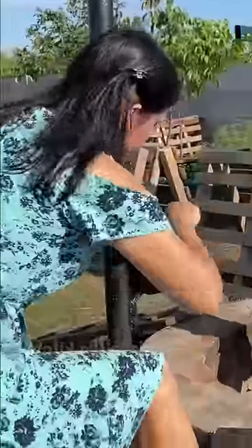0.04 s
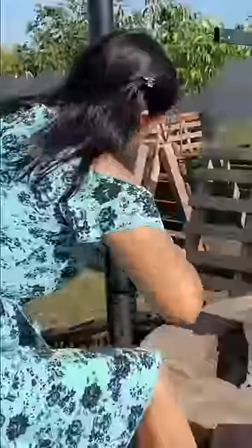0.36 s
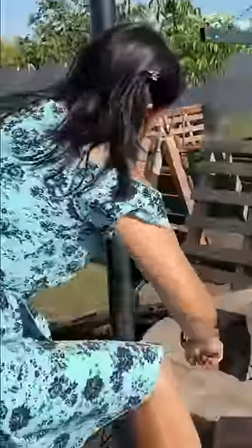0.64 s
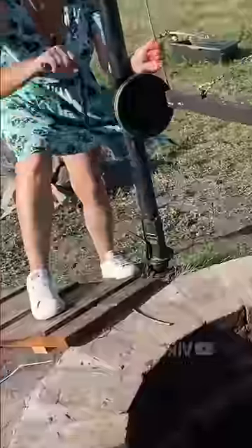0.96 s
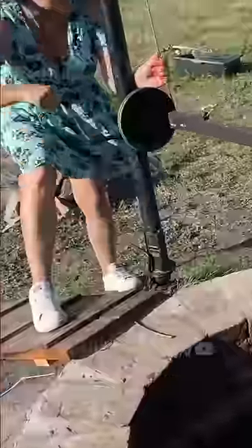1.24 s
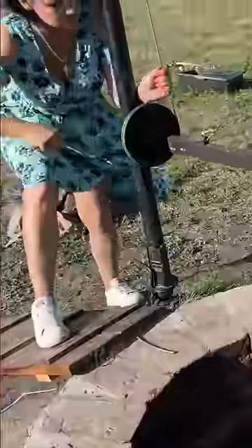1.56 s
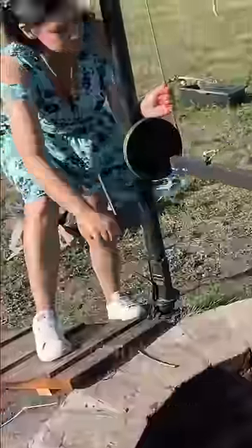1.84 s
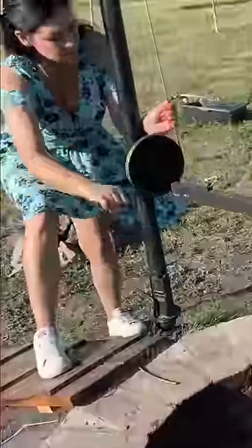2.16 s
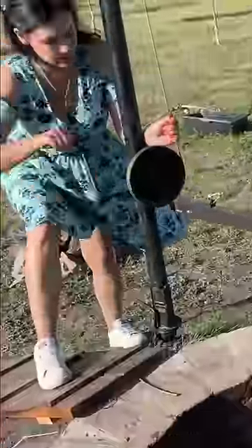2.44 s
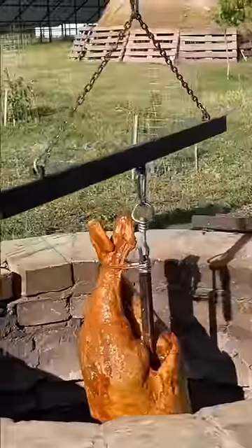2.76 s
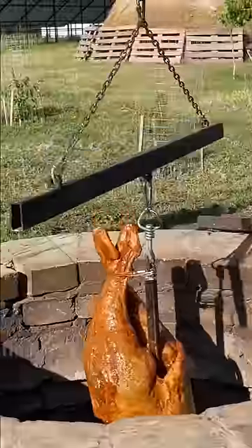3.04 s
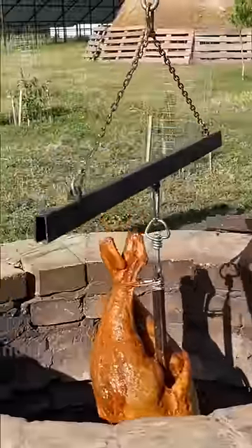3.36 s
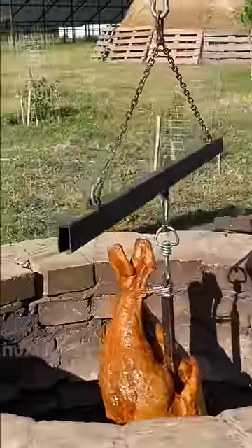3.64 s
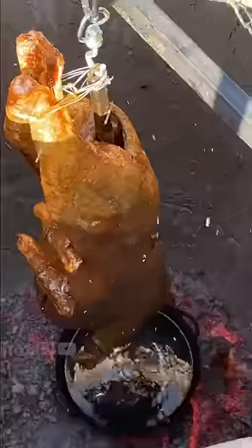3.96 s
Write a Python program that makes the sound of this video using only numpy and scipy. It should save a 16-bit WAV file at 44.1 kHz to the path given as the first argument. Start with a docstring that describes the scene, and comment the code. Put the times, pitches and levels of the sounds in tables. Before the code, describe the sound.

A hand winch ratchet clicks rapidly for the whole four seconds, in uneven runs at about two and a half turns a second. Each steel tooth rasps, snaps and rings briefly, with clanks and light ticks between runs. One tooth catches with a hard crunch at about 0.9 seconds, and the post thuds softly, most at 1.1 seconds. Faint outdoor hush and low wind lie underneath.

```python
"""Hand winch outdoors.

A winch is cranked about two and a half turns a second, hoisting a load from a pit. At each tooth the pawl rasps
up the steel flank and snaps down, ringing wheel and frame; once a heavy clack crunches the frame. Between runs
of teeth the gear ticks lightly. The post knocks and thuds over faint air and wind."""
import sys
import numpy as np
from scipy import signal
from scipy.fft import rfft, irfft
from scipy.io import wavfile
from scipy.ndimage import uniform_filter1d

SR = 44100
rng = np.random.default_rng(int(sys.argv[2]) if len(sys.argv) > 2 else 0)


def wav_record(signal):
    """Record a signal, one row per channel, as 16-bit PCM in the file named by sys.argv[1]."""
    frames = np.transpose(np.atleast_2d(signal))
    bounded = np.clip(frames, -1, 1)
    # unit amplitude maps onto the largest positive 16-bit level
    quanta = np.round(bounded * 32767).astype(np.int16)
    wavfile.write(sys.argv[1], SR, quanta)


N = 176400
TAPS = 4096
HZ = np.fft.rfftfreq(TAPS, 1 / SR)

# Pawl passing a tooth. Each row: snap time in seconds, snap in dB, rasp in dB,
# frame clank lift in dB, high ping lift in dB, kind of contact.
TEETH = [(0.0397, -23.5, -30, -4.5, 9.5, "glint"), (0.0878, -11.5, -23, -7, 0, "crack"),
         (.1603, -18, -23, -6, -4, "plain"), (0.2161, -14, -21, -9, -5.5, "plain"),
         (0.3321, -16.5, -27, 3, 0, "clank"), (0.389, -21, -29, -4.5, 4.5, "glint"),
         (0.4365, -14, -21, -10.5, -2.5, "crack"), (0.5, -15.5, -24, -4, -0.5, "plain"),
         (0.552, -18.5, -20, -10, -8, "plain"), (.6946, -18, -24.5, 2.5, .5, "clank"),
         (0.751, -22, -31, -5.5, 6.5, "glint"), (0.8042, -18.5, -21.5, -5.5, -2, "crack"),
         (0.8744, -12, -20.5, 4, -7, "plain"), (0.9683, -19.5, -28.5, -7.5, 0, "glint"),
         (1.0127, -15.5, -23.5, -2, 2.5, "crack"), (1.0634, -15, -30.5, 7.5, 5.5, "plain"),
         (1.1045, -10, -27, -5.5, -5, "plain"), (1.22, -20.5, -28.5, 8.5, 7, "clank"),
         (1.2778, -24.5, -28.5, -7, 3.5, "glint"), (1.3258, -18.5, -23.5, 1, 1, "crack"),
         (1.3848, -18, -34, 3.5, 17, "ping"), (1.4419, -17.5, -23, -5, 0, "plain"),
         (1.5712, -17.5, -29.5, 13.5, 6, "clank"), (1.6184, -22, -31, -5.5, 3, "glint"),
         (1.6618, -14, -24, -6.5, 2, "plain"), (1.726, -20, -28, -4, 8.5, "ting"),
         (1.781, -17, -23, -9, -1, "plain"), (1.9381, -23, -26.5, 9, 0.5, "clank"),
         (2.0004, -24.5, -30, -8, 2, "glint"), (2.07, -16.5, -23, -4, 0, "plain"),
         (2.1419, -23.5, -26.5, -3.5, -2, "plain"), (2.2033, -19.5, -24, -4.5, 1.5, "plain"),
         (2.344, -38, -26.5, 10, 2, "clank"), (2.415, -21.5, -31.5, -6.5, 3.5, "glint"),
         (2.4679, -42, -21.5, -6.5, -1, "plain"), (2.5393, -22, -31.5, 0.5, 17, "ping"),
         (2.6006, -20, -24.5, -4.5, 2, "plain"), (2.7623, -19, -29.5, 9, 5, "clank"),
         (2.8208, -19, -31.5, -6, -1, "glint"), (2.8795, -16, -23, -5.5, 2.5, "plain"),
         (2.9458, -24, -28.5, 2.5, 10, "ting"), (3.0006, -12, -22.5, -10, -2.5, "plain"),
         (3.159, -19.5, -29, 14.5, 5.5, "clank"), (3.2283, -26, -29, -5, 2, "glint"),
         (3.2792, -13.5, -22, -5.5, -0.5, "plain"), (3.3457, -25, -29, 2.5, 12.5, "ting"),
         (3.4, -14, -22.5, -8.5, -6.5, "plain"), (3.574, -19, -28, 12, 4.5, "clank"),
         (3.6535, -24.5, -30.5, -11, 3.5, "glint"), (3.7092, -14.5, -21, -8.5, -5, "crack"),
         (3.7796, -18.5, -28, 0, 5.5, "ting"), (3.8472, -20.5, -22, -7, -2, "plain")]


def amp(db):
    """Decibels to gain."""
    return 10 ** (np.asarray(db) / 20)


def unit(x):
    """Scale to rms 1."""
    return x / np.sqrt(np.mean(x ** 2) + 1e-20)


def add(mix, start_s, sound):
    """Mix a sound in, cropped at both ends."""
    at = round(start_s * SR)
    part = mix[max(at, 0):max(at + len(sound), 0)]
    part += sound[max(-at, 0):][:len(part)]


def curve_at(points, hz):
    """Interpolate (Hz, value) points over log frequency."""
    point_hz, value = np.transpose(points)
    return np.interp(np.log(hz + 1), np.log(point_hz + 1), value)


def peaks(modes):
    """Summed resonance curves over HZ."""
    return sum(lift / (1 + (2 * (HZ - hz) / width_hz) ** 2) for hz, width_hz, lift in modes)


def shaped_noise(size, db_at):
    """Unit-rms noise with spectral shape db_at(hz)."""
    gain = amp(db_at(np.fft.rfftfreq(size, 1 / SR)))
    return unit(irfft(rfft(rng.standard_normal(size)) * gain, size))


def band_noise(hz, width_hz, size):
    """Noise in one steep resonance."""
    return shaped_noise(size, lambda f: -20 * np.log10(1 + (2 * (f - hz) / width_hz) ** 2))


def open_air():
    """Steady hush and low wind rumble; the level dips briefly once."""
    # Hush spectrum. Each row: frequency in Hz, relative level in dB.
    air_shape = [(20, -10), (40, -16.5), (80, 0), (180, 6.5), (450, -3), (700, -6), (1500, -9.5),
                 (2500, -10), (3700, -5.5), (5000, -13), (8000, -18), (12000, -24), (16000, -31)]
    # Wind strength. Each row: time in seconds, relative level in dB.
    wind_curve = [(0, -73), (.35, -59), (.85, -65), (1.0, -56), (1.4, -49), (1.6, -56), (2.15, -52),
                  (2.6, -63), (3.2, -60), (4, -59)]
    t = np.arange(N) / SR
    hush = amp(-54) * shaped_noise(N, lambda f: curve_at(air_shape, f))
    rumble = shaped_noise(N, lambda f: -10 * np.log10((1 + (f / 92) ** 4) * (1 + (25 / (f + 1)) ** 4)))
    wind_db = np.interp(t, *np.transpose(wind_curve)) - 7
    dip_db = -10 * np.exp(-((t - 0.925) / 0.015) ** 2)
    return amp(dip_db) * (hush + rumble * amp(wind_db))


def rasp(t, rasp_db, snap_db):
    """The pawl scrapes up the flank, sagging just before the snap at t = 0, then rattles out."""
    full_s, rise_s, sag_db, decay_db_per_s = 0.011, 0.0078, -4.5, 1356
    early = np.maximum(-t - full_s, 0) / rise_s
    swell_db = -19 * (np.sqrt(1 + early ** 2) - 1)
    sag = np.clip(1 + t / full_s, 0, 1)
    climb = amp(rasp_db + 1.34 + swell_db + sag_db * sag)
    rattle = np.hypot(amp(rasp_db - 2), amp(snap_db - 17)) * amp(-decay_db_per_s * abs(t))
    noise = rng.standard_normal(len(t))
    grain_db = 1.2 * unit(uniform_filter1d(rng.standard_normal(len(t)), size=24))
    return np.where(t < 0, climb, rattle) * unit(noise * amp(grain_db))


def snap(t, strike_share):
    """The pawl lands: milliseconds of chatter with one hard strike at the crest."""
    lead_s, rise_s, decay_s = 0.0004, 0.0012, 0.0013
    t = t + lead_s
    envelope = np.exp(-abs(t) / np.where(t < 0, rise_s, decay_s))
    chatter = envelope * rng.choice([-1., 1.], len(t))
    chatter /= np.linalg.norm(chatter)
    strike = np.arange(len(t)) == np.argmin(abs(t))
    force = np.sqrt(strike_share) * strike + np.sqrt(1 - strike_share) * chatter
    return amp(2.5) * np.sqrt(decay_s * SR) * force


def steel_response_db():
    """Frequency response of wheel, pawl and frame, at unit power."""
    # Broad colour. Each row: frequency in Hz, relative level in dB.
    colour = [(150, -24), (450, -23.5), (680, -26), (1000, -16.5), (1600, -14.5), (2600, -12),
              (5000, -14.5), (6000, -7), (7600, -5.5), (8300, -12), (9800, -5), (10650, -6), (11500, -20),
              (13000, -22.5), (15700, -27)]
    # Resonances. Each row: frequency in Hz, width in Hz, lift over the colour in dB.
    modes = [(1027, 80, 7.5), (1152, 57, -6), (1670, 104, -4.5), (1948, 190, 13), (2950, 210, 7),
             (3496, 121, 14), (3652, 65, 9.5), (3980, 390, 7), (4340, 90, -4.5), (4530, 510, 5.5),
             (5374, 68, 11.5), (5640, 42, 8.5), (6205, 115, 3.5), (6450, 80, 8.5), (7170, 80, 2),
             (7930, 170, 5.5), (8510, 61, 9.5), (8940, 87, 7), (9120, 93, -5.5), (11610, 180, 10),
             (12470, 260, 9.5)]
    db = curve_at(colour, HZ) + peaks(modes)
    return db - 10 * np.log10(np.mean(amp(db) ** 2))


def ring_steel(force, response_db):
    """A force rings the loaded, quickly damped steel, slightly differently at each contact."""
    ripple_db, ripple_width_hz, damping_s = 1.57, 320, 0.009
    smoother = np.exp(-(2 * (HZ[:200] - HZ[100]) / ripple_width_hz) ** 2)
    ripple = unit(signal.oaconvolve(rng.standard_normal(len(HZ)), smoother, "same"))
    varied_db = response_db + ripple_db * ripple
    varied_db += 10 * np.log10(np.sum(amp(response_db) ** 2) / np.sum(amp(varied_db) ** 2))
    log_gain = np.log(amp(np.r_[varied_db, varied_db[-2:0:-1]]))
    impulse = np.fft.ifft(np.exp(np.conj(signal.hilbert(log_gain)))).real  # minimum phase
    damped = impulse * np.exp(-(np.arange(TAPS) / SR / damping_s) ** 2)
    return signal.fftconvolve(force, damped[:TAPS // 2])


def ratchet():
    """Rasp and snap ring the steel at every tooth, with light ticks and rubs between."""
    # Pawl on tooth, by kind. Each row: strike's share of snap energy, ping in Hz, glint lift in dB.
    contacts = {"plain": (.1, 7150, 0), "crack": (.5, 7150, 0), "clank": (.17, 7850, -2),
                "glint": (.1, 7300, 17), "ping": (.42, 6950, 17), "ting": (.45, 7550, 18)}
    # Frame clank. Each row: frequency in Hz, share of the lift.
    clank_shape = [(300, 0), (750, 0.1), (1100, 0.75), (1550, 0.4), (2100, 0.83), (2650, 0.25),
                   (3600, 0.32), (5800, -0.27), (7500, 0)]
    # Glinting contact. Each row: frequency in Hz, width in Hz, share of the lift.
    glint_modes = [(1390, 530, 0.367), (14680, 470, 1)]
    # Ticks at the slow point of the turn. Each row: time in seconds, level in dB.
    ticks = [(0.278, -29), (0.6311, -27.5), (1.1703, -29.5), (1.8687, -27.5), (2.2797, -31),
             (2.6973, -32.5), (3.0884, -33), (3.4871, -31.5), (3.9418, -29.5)]
    # Gear rubs. Each row: start in seconds, length in seconds, level in dB.
    rubs = [(1.485, 0.049, -41), (1.807, 0.026, -48.5)]
    ping_width_octaves, brush_s = 0.105, 0.0076
    out = np.zeros(N)
    t = np.arange(-TAPS // 2, TAPS // 2) / SR
    steel_db, clank, glint = steel_response_db(), curve_at(clank_shape, HZ), peaks(glint_modes)
    for at_s, snap_db, rasp_db, clank_db, ping_db, kind in TEETH:
        strike_share, ping_hz, glint_db = contacts[kind]
        force = rasp(t, rasp_db, snap_db) + amp(snap_db) * snap(t, strike_share)
        ping = np.exp(-0.5 * (np.log2((HZ + 1) / ping_hz) / ping_width_octaves) ** 2)
        response_db = steel_db + clank_db * clank + ping_db * ping + glint_db * glint
        add(out, at_s + t[0], ring_steel(force, response_db))
    for at_s, db in ticks:  # each barely brushes the tooth and nudges the frame
        brush = amp(db - 12.5) * np.exp(-abs(t) / brush_s) * rng.standard_normal(TAPS)
        force = amp(db) * snap(t, strike_share=0.1) + brush
        add(out, at_s + t[0], ring_steel(force, steel_db + 3 * clank))
    for start_s, length_s, db in rubs:
        swell = np.sin(np.pi * np.arange(0, length_s, 1 / SR) / length_s)
        friction = amp(db) * swell * rng.standard_normal(SR)[:len(swell)]
        add(out, start_s, ring_steel(friction, steel_db))
    return out


def wheel_ring(drive):
    """The wheel sings on briefly after each tooth."""
    # Long-ringing modes. Each row: frequency in Hz, gain in dB, T60 in seconds.
    modes = [(3650, -9, .16), (3730, -7, .22), (9920, -9, .08), (10260, -8, .07), (10560, -11, .06)]
    t = np.arange(SR // 2) / SR
    impulse = np.zeros(len(t))
    for hz, db, t60_s in modes:
        decay = amp(-60 * t / t60_s)
        impulse += amp(db) * 2 * decay / decay.sum() * np.sin(2 * np.pi * hz * t)
    return signal.fftconvolve(drive, impulse)[:N]


def post():
    """The post knocks under each snap and thuds as the load shifts."""
    # Knock resonances. Each row: frequency in Hz, width in Hz, relative level in dB.
    knock_bands = [(273, 210, -47), (405, 46, -49.5), (482, 22, -48.5)]
    # Thuds. Each row: start in seconds, level in dB.
    thuds = [(0.208, -49.5), (0.869, -47), (1.1, -39), (1.48, -47), (2.345, -53), (2.696, -46.5),
             (3.09, -52), (3.938, -50)]
    knock_lead_s, knock_rise_s, knock_db_per_snap_db = 0.0019, 0.0045, 0.28
    thud_hz, thud_width_hz, thud_rise_s = 190, 74, 0.01
    out = np.zeros(N)
    t = np.arange(2 * TAPS) / SR
    knock_envelope = t / knock_rise_s * np.exp(1 - t / knock_rise_s)
    thud_envelope = t / thud_rise_s * np.exp(1 - t / thud_rise_s)
    for at_s, snap_db, *_ in TEETH:
        knock = sum(amp(db) * band_noise(hz, width_hz, len(t)) for hz, width_hz, db in knock_bands)
        add(out, at_s - knock_lead_s, amp(knock_db_per_snap_db * snap_db) * knock * knock_envelope)
    for start_s, db in thuds:
        tone = np.sin(2 * np.pi * thud_hz * t) + 0.5 * band_noise(thud_hz, thud_width_hz, len(t))
        add(out, start_s, amp(db) * tone * thud_envelope)
    return out


def heavy_clack():
    """A single heavy clack crunches the whole frame."""
    # Crunch bands. Each row: frequency in Hz, width in Hz, level in dB.
    bands = [(235, 540, -42.5), (1920, 220, -30), (2090, 240, -28.5)]
    at_s, spread_s = 0.873, 0.014
    out = np.zeros(N)
    t = np.arange(-TAPS // 2, TAPS // 2) / SR
    grind = sum(amp(db) * band_noise(hz, width_hz, TAPS) for hz, width_hz, db in bands)
    add(out, at_s + t[0], grind * np.exp(-(t / spread_s) ** 2))
    return out


def scene():
    """The winch straight ahead, the same in both ears."""
    winch = ratchet()
    mono = winch + wheel_ring(winch) + post() + heavy_clack() + open_air()
    return np.array([mono, mono])


def record(dry):
    """Steep low-pass band limit."""
    cutoff_hz = 15900
    lowpass = signal.firwin(511, cutoff_hz, window=("kaiser", 9), fs=SR)
    return signal.oaconvolve(dry, lowpass[None], "same")


dry = scene()
out = record(dry)
wav_record(out)
```